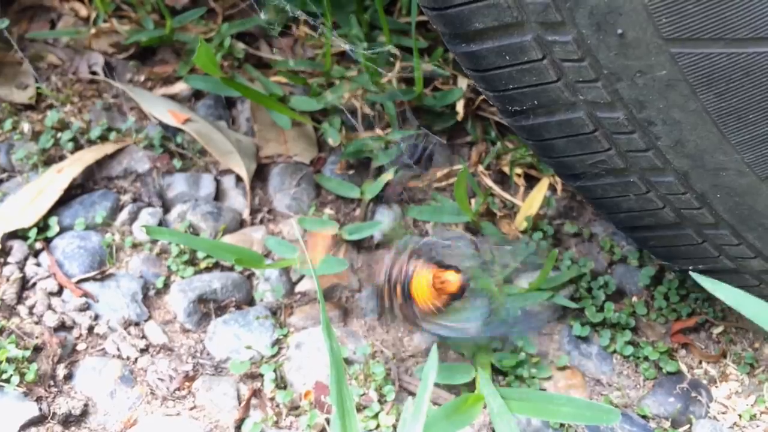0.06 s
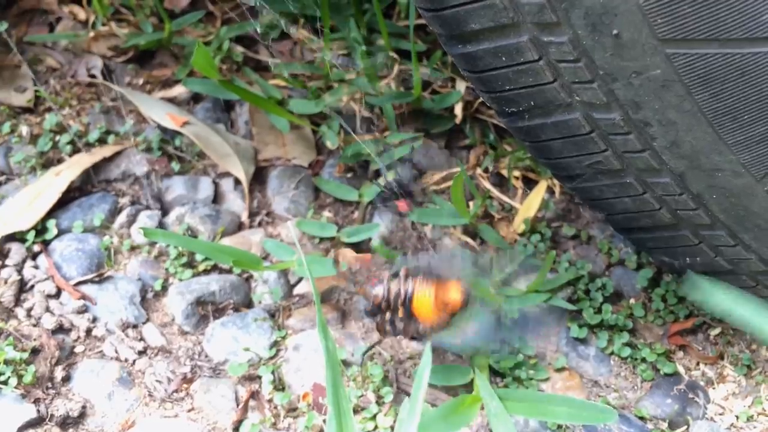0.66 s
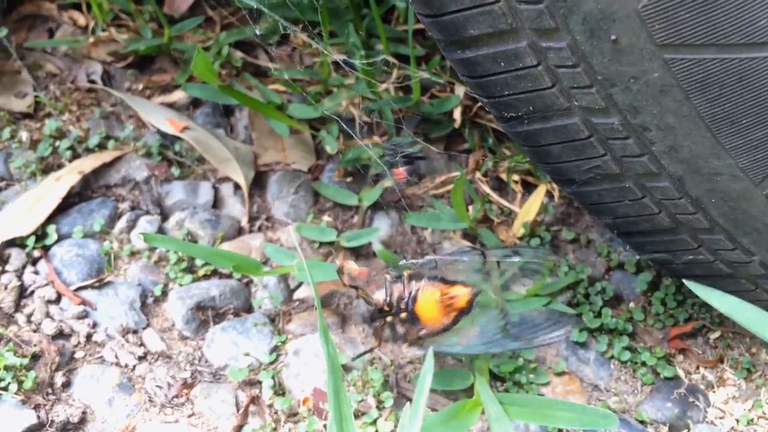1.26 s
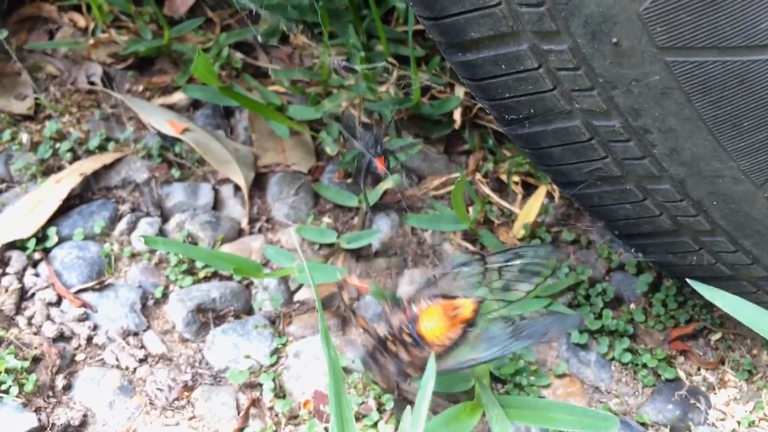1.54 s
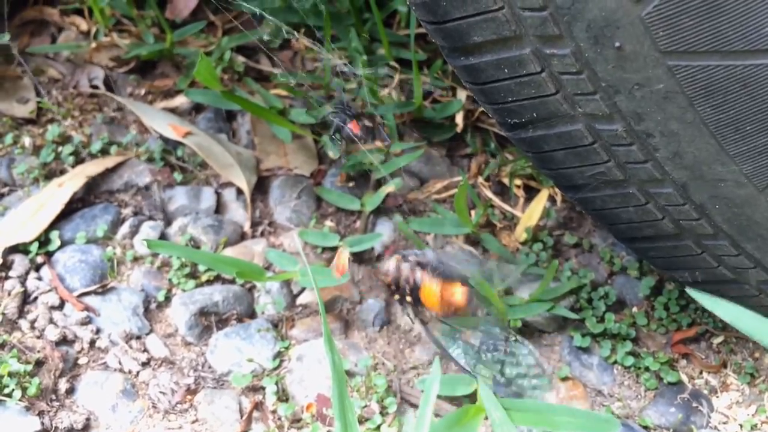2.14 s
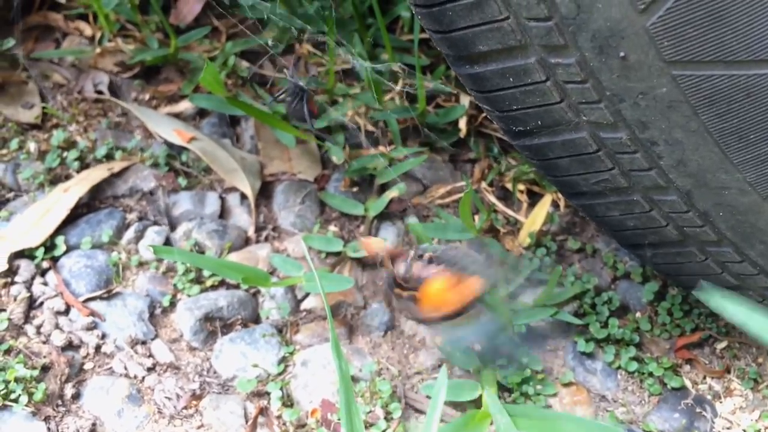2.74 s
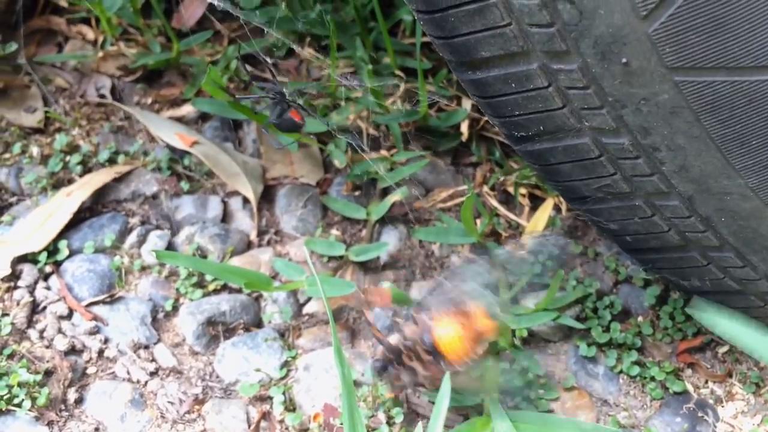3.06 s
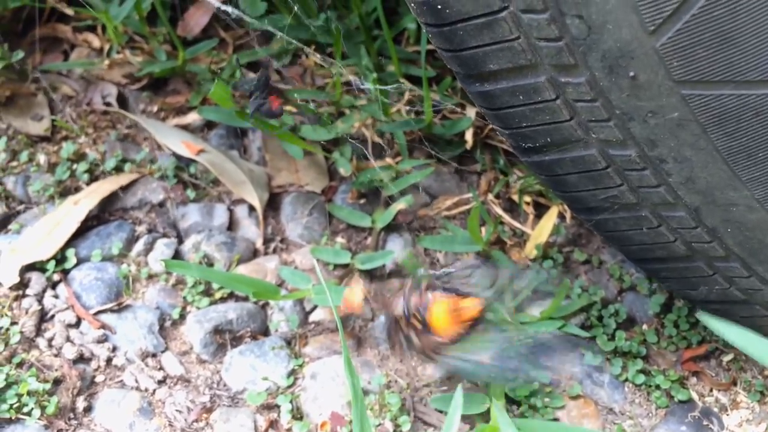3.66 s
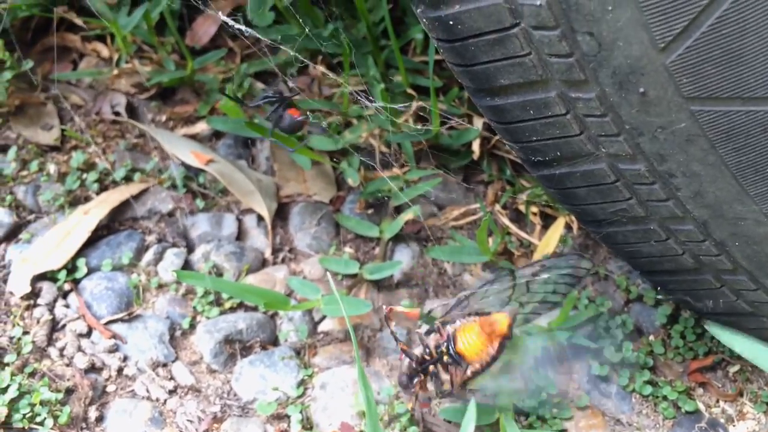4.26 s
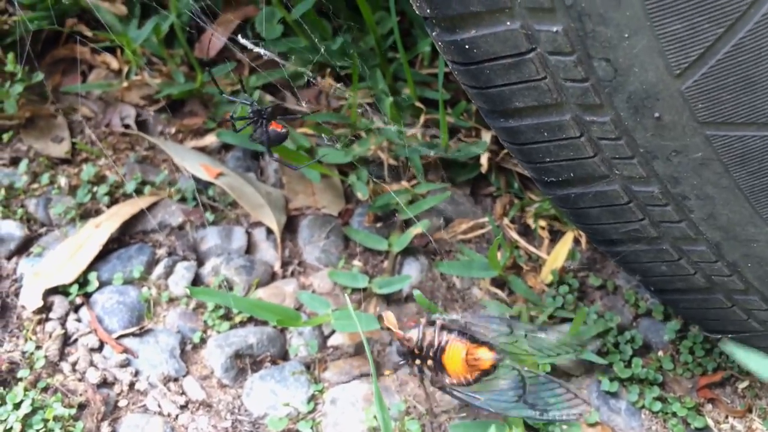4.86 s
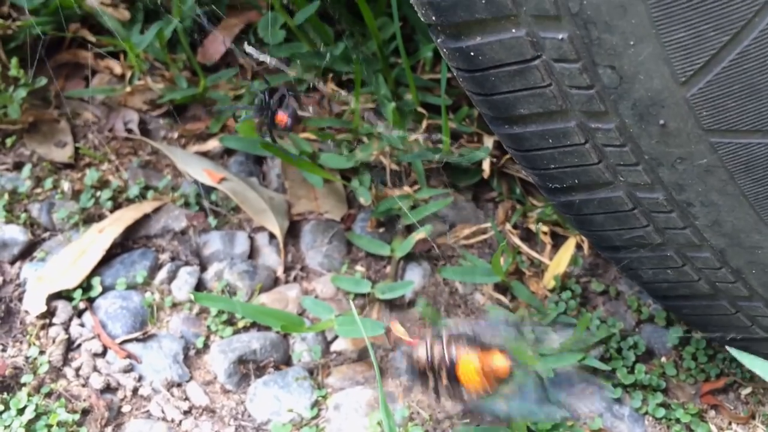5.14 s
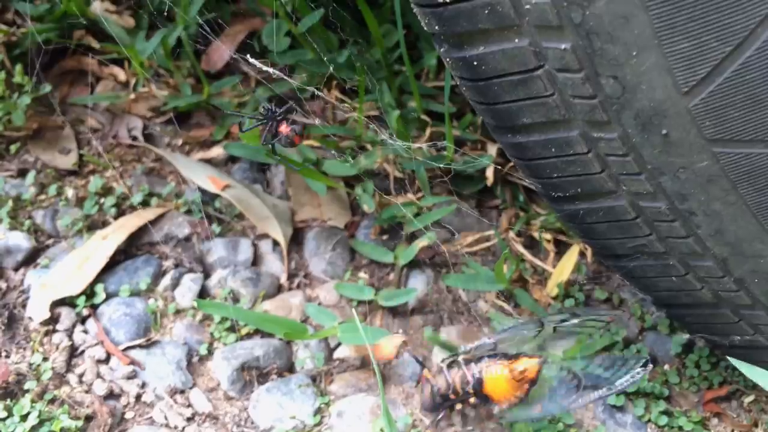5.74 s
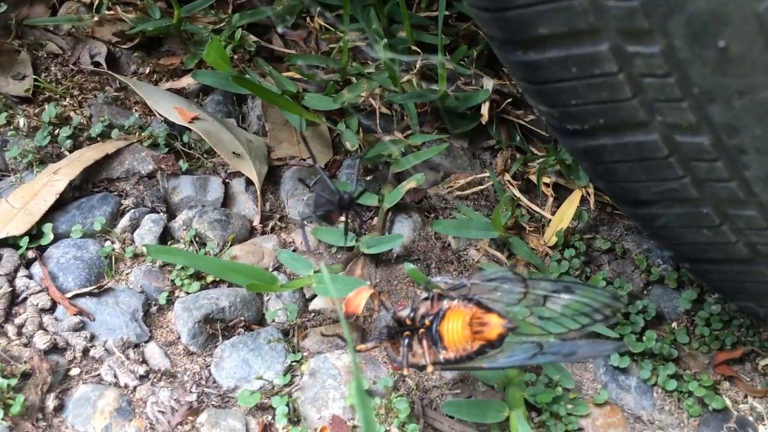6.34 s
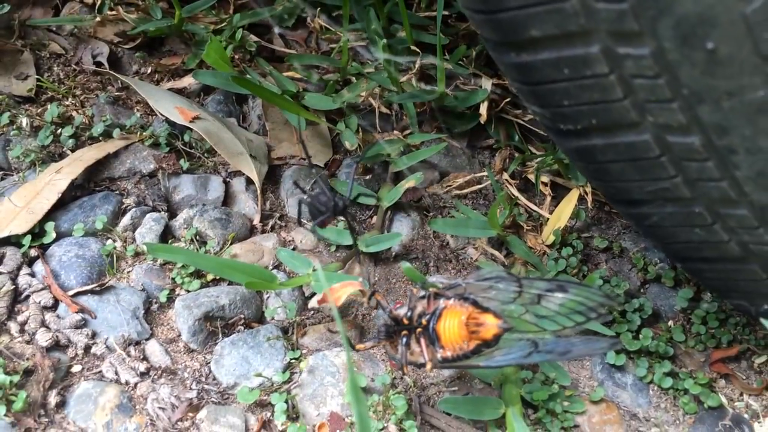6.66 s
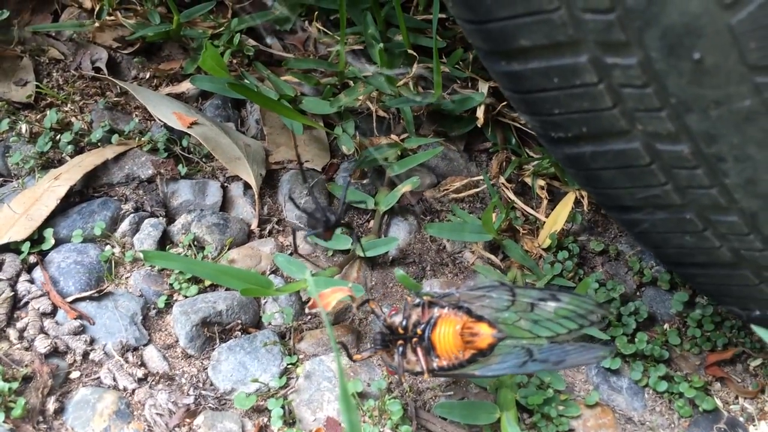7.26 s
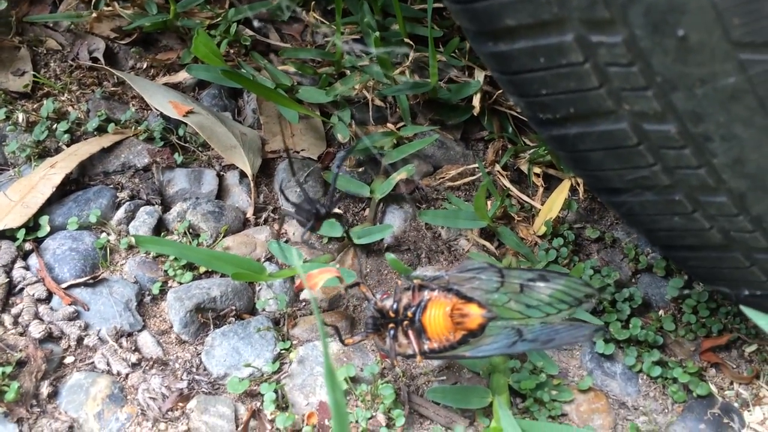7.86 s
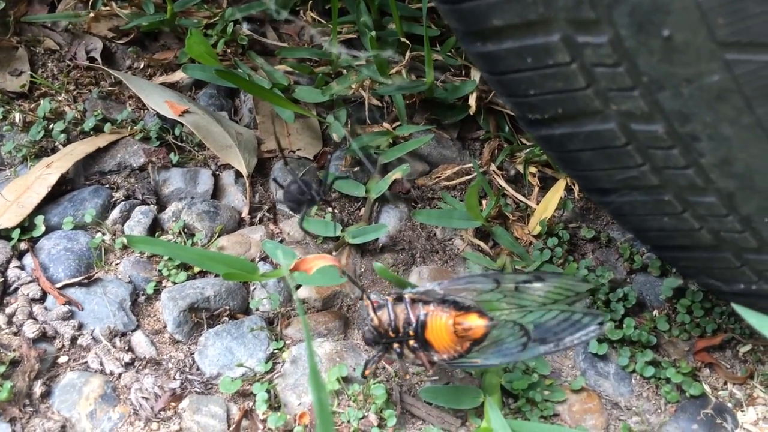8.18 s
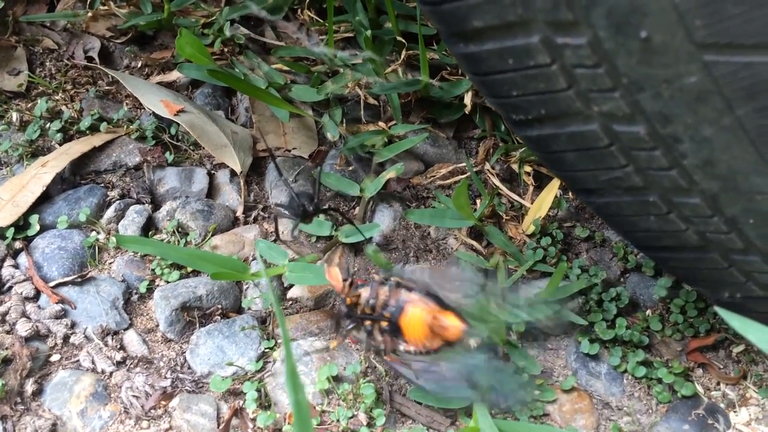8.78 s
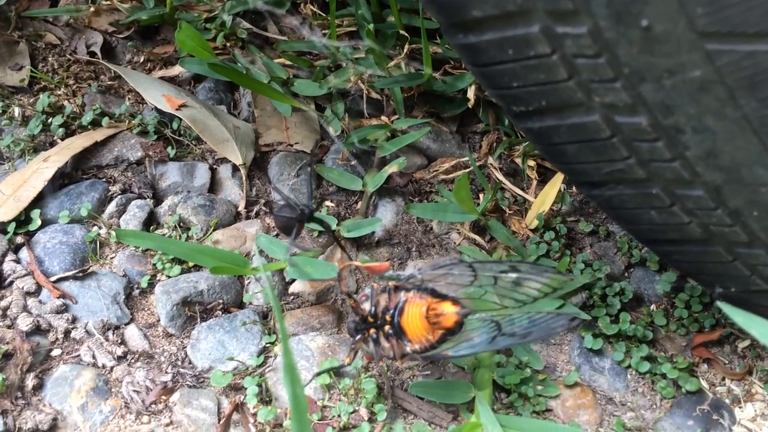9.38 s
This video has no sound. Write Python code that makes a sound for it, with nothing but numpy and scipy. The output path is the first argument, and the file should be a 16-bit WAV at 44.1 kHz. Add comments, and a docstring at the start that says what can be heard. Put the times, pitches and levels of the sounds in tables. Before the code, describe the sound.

Close, dry clicking wing flicks of a struggling insect thin out after a low microphone thud, over faint distant birds.

```python
"""On the ground outdoors, close to the microphone of a hand-held camera, a cicada thrashes in a spider's web.
From the start its stiff wings clap and rustle against grit, grass and each other, over faint hiss, rumble
and hum. From about 1 s birds whistle in the trees and the hand bumps the camera now and then; by 3 s far
insects have swelled in. Just before 6 s the camera takes one firm knock. The tiring cicada flicks once
just after the knock, pauses while hoarse birds call in the distance, then flicks twice more after 8 s."""
import sys
import numpy as np
from scipy import signal
from scipy.fft import rfft, irfft, next_fast_len
from scipy.io import wavfile
from scipy.ndimage import uniform_filter1d, map_coordinates

SR = 44100
rng = np.random.default_rng(int(sys.argv[2]) if len(sys.argv) > 2 else 0)


def unload_wav(signal):
    """Save mono or channel-first audio to the path in sys.argv[1] as 16-bit WAV at rate SR, clipped to [-1, 1]."""
    wavfile.write(
        sys.argv[1],
        SR,
        np.round(np.clip(np.atleast_2d(signal).T, -1, 1) * 32767).astype(np.int16),
    )


N = 423801

# Wing flicks close to the microphone: the wings open, clap (one leading the other) and fold shut.
# clap_s, clap_db, body_share_db, brightness_db, t60_s, lead_s, open_db, fold_after_s, fold_db, rustle_db
WING_FLICKS = [(.0436, -31.5, -5, 1, .016, 0.00069, -32, 0.021, -37, -49),
               (.236, -43, -9, 0.5, .015, 0.011, -37.5, 0.029, -37.5, -51),
               (0.4483, -37, -13, 6, 0.0099, 0.014, -39.5, 0.0065, -50, -51.5),
               (0.5997, -22, -13.5, 5, 0.007, .0073, -62, 0.026, -33, -51),
               (.8156, -20, -10.5, 5, .009, 0.0047, -51, 0.033, -26, -48.5),
               (0.8704, -36, -13.5, 5, 0.02, 0.0013, -47, 0.048, -36.5, -67),
               (1.0072, -19, -13.5, 4, 0.012, 0.0065, -54, 0.03, -32, -54.5),
               (1.2089, -24, -10, -3.5, 0.017, .0065, -46, .031, -36.5, -53.5),
               (1.4293, -25, -12, 4, .011, 0.0076, -35, 0.019, -29, -57),
               (1.4725, -20, -12.5, 3, 0.026, 0.0048, -39, 0.064, -39.5, -57.5),
               (1.7104, -17.5, -14, 3.5, 0.011, 0.0043, -43, 0.029, -37.5, -56.5),
               (2.1275, -27, -7.5, 2.5, .005, 0.0081, -47, .0235, -26, -55.5),
               (2.1798, -28, -11.5, 2.5, 0.042, 0.0016, -40, 0.055, -39.5, -60),
               (2.346, -29, -13, 4, 0.013, 0.0066, -37.5, 0.022, -47, -49),
               (2.3827, -26.5, -21, 11, .009, 0, -53, .0103, -31.5, -54),
               (2.5621, -34, -18.5, 7, 0.012, 0.013, -31, .01, -32.5, -54),
               (2.761, -21.5, -15, 10, 0.02, 0.0053, -32, 0.028, -25.5, -52),
               (2.939, -35, -13.5, 10, 0.017, .0136, -54, 0.025, -38, -53),
               (3.1552, -34.5, -15.5, 6, 0.02, 0.01, -59, .04, -34.5, -55),
               (3.4135, -28.5, -9, 2, 0.02, 0.0075, -38.5, 0.034, -25.5, -53),
               (3.4914, -37.5, -19, 17, .033, 0, -59, 0.0065, -44, -70),
               (3.6039, -24, -9.5, 5, 0.014, 0.01, -35, .012, -34, -54),
               (3.6423, -25, -8, 0.5, 0.017, 0.0018, -42, .051, -36.5, -51),
               (3.795, -25.5, -14, 2.5, 0.015, 0.0077, -52, 0.046, -32, -57.5),
               (3.9593, -22, -10, 1, 0.0096, 0.011, -60, 0.021, -51, -54.5),
               (4.1536, -19.5, -11.5, 3.5, 0.018, 0.0053, -55, 0.025, -46, -53),
               (4.3859, -25, -11, 4, 0.0076, 0.0069, -53, 0.029, -38.5, -54.5),
               (4.659, -20, -14, 4.5, 0.011, 0.0065, -47, 0.011, -38, -55),
               (5.0867, -26.5, -11.5, -2.5, 0.011, .0055, -63, 0.031, -44, -50.5),
               (5.3524, -22.5, -14, 2.5, 0.0066, 0.005, -54, 0.019, -47, -56),
               (5.5941, -20.5, -13.5, 3.5, 0.01, 0.0052, -53, 0.016, -40, -53),
               (5.9953, -30, -13.5, 8.5, 0.029, 0.0044, -44, 0.0039, -56, -68),
               (8.0822, -28, -13.5, 7, 0.021, 0.0026, -48, 0.02, -41, -65),
               (8.867, -31, -14.5, 3, 0.0072, 0.0051, -53, 0.019, -39, -57.5)]
# Lone taps of a wing, just as close: start_s, level_db
WING_TAPS = [(.5495, -47), (.7676, -46), (.975, -34.5), (1.5581, -43), (1.8624, -61), (2.7114, -42),
             (5.1237, -42.5)]
OPEN_S = 0.0265  # the wings open this long before the clap


def wing_contacts(lead_db=-7.5, graze_db=8.5, graze_spread_db=2, graze_reach_s=0.016):
    """Every touch of the wings, as rows of start_s, level_db, body_share_db, brightness_db, t60_s."""
    tap, graze = (-20, -2.2, 0.011), (-19.5, 12, 0.014)  # body_share_db, brightness_db, t60_s
    # against the clap: more_body_db, more_brightness_db; then the stroke's own t60_s
    first_wing, opening, folding = (2, -4, 0.012), (-3.5, 1, 0.017), (-4.5, 2.5, 0.026)
    rows = [(s, db, *tap) for s, db in WING_TAPS]
    for s, db, body_db, bright_db, clap_t60, lead_s, open_db, fold_s, fold_db, rustle_db in WING_FLICKS:
        rows.append((s, db, body_db, bright_db, clap_t60))
        strokes = [(s - lead_s, db + lead_db, first_wing),
                   (s - OPEN_S, open_db, opening),
                   (s + fold_s, fold_db, folding)]
        for when, level, (more_body, more_bright, t60) in strokes:
            rows.append((when, level, body_db + more_body, bright_db + more_bright, t60))
        # wing tips graze the ground by chance as they open and as they fold
        for centre in (s - OPEN_S - graze_reach_s / 2, s + fold_s):
            late, soft = rng.uniform(-1, 1, 2)
            rows.append((centre + graze_reach_s * late, rustle_db + graze_db - graze_spread_db * soft,
                         *graze))
    return rows


# Ring of the stiff wing membrane, heard from close by: frequency_hz, gain_db
WING_RING = [(150, -11), (290, -15.5), (430, -7), (880, -4.5), (1250, -5.5), (2100, -8.5), (3100, -5),
             (4200, -13.5), (5200, -10), (6250, -2), (7600, -7), (10200, -2.5), (12500, -4.5),
             (15000, -7.5)]


def wing_claps(snap=2.94, crinkle=0.58, firmness=0.21, heft=0.21, rise_s=0.00024, bounce_s=0.0012):
    """A wing strikes with one sharp snap, then its membrane crinkles for a few milliseconds."""
    size = 4096
    out, t, hz = np.zeros(N), np.arange(size) / SR, np.fft.rfftfreq(size, 1 / SR)
    deep = 1 / (1 + (hz / 600) ** 4)
    body = 1 / (1 + (hz / 4200) ** 8)
    bright = 1 - 1 / (1 + (hz / 9000) ** 6)
    middle = (1 - body) * (1 - bright)
    ring = amp(along(WING_RING, hz))
    hardest_db = max(row[1] for row in WING_FLICKS)
    for s, db, body_db, bright_db, t60 in wing_contacts():
        force_db = db - hardest_db
        noise, grain = rng.standard_normal((2, size))
        # the crinkling comes in clumps, one for each fold that gives way
        folds = np.exp(crinkle * unit(uniform_filter1d(grain, size=16)))
        blow = noise * unit(folds) * amp(-60 * t / t60)
        # glancing blows slide into contact and hardly snap
        blow *= 1 - np.exp(-t * amp(force_db / 2) / rise_s)
        blow[0] -= snap * amp(firmness * force_db)
        # the place of contact sets how strongly body and tip of the wing sound
        tip = amp(bright_db) ** 2
        shares = [(body, amp(body_db) ** 2), (middle, 1 / (1 + tip)), (bright, tip / (1 + tip))]
        gain = ring * np.sqrt(sum(band * share / np.sum(band * ring ** 2) for band, share in shares))
        # only hard blows near the wing's root bend the whole wing
        gain *= amp((heft * force_db - 0.75 * bright_db + 2) * deep)
        # the nearest stones throw the clap back within a millisecond or two
        stones = 1 + 0.22 * np.exp(-2j * np.pi * hz * bounce_s * rng.uniform(0.49, 2))
        clap = irfft(rfft(blow) * causal(gain) * stones)
        add(out, s, amp(db) * clap * np.sqrt(SR / 500 / np.sum(clap ** 2)))  # level as if 2 ms long
    return out


# Wings brushing grass and grit in front of the microphone: frequency_hz, gain_db
BRUSH_SPECTRUM = [(200, -37), (700, -7), (2000, -11), (4500, -8.5), (6300, -8), (10000, -1), (15000, -12)]


def wing_rustle(beat_hz=41, beat_db=4, open_db=-7, open_width_s=0.015,
                rise_s=0.0071, settle_s=0.018, fade_s=0.012):
    """As they open, and from the clap until they fold, the wings brush the ground in tiny ticks."""
    t = np.arange(SR // 4) / SR
    effort = np.zeros(N)
    for s, *_, fold_s, _, rustle_db in WING_FLICKS:
        start = max(s - 0.1, 0)
        since = start + t - s
        opening = amp(open_db) * np.exp(-((since + OPEN_S + open_width_s / 2) / open_width_s) ** 2 / 2)
        early, late = np.maximum(-since, 0), np.maximum(since - fold_s - settle_s, 0)
        closing = np.exp(-early / rise_s - late / fade_s)
        add(effort, start, amp(rustle_db) * np.maximum(opening, closing))
    stroke = np.sin(2 * np.pi * np.cumsum(beat_hz * (1 + 0.1407 * wobble(12))) / SR)
    ticks = rng.standard_normal(N) * amp(5 * wobble(450) + 3 * wobble(2500))
    return effort * coloured(ticks * amp(beat_db * stroke), BRUSH_SPECTRUM)


# Bumps of the hand, right at the microphone: start_s, level_db, length_s, pitch_hz
HAND_BUMPS = [(1.196, -46, 0.049, 81), (1.427, -54, .063, 102), (1.626, -56.5, .12, 58),
              (3.159, -45, 0.11, 60.7), (3.59, -48, 0.063, 59.4), (3.982, -49.5, 0.067, 60.5),
              (5.312, -45.5, 0.069, 64.4), (5.636, -52, 0.065, 80), (5.781, -42.5, 0.11, 61.3),
              (6.781, -50, 0.035, 79), (7.058, -47.5, 0.085, 90.6), (7.259, -45.5, 0.074, 74.8),
              (7.469, -49, 0.089, 85.2), (7.799, -54, 0.095, 63), (8.101, -51, .035, 65.6),
              (8.861, -50, 0.062, 80.7), (9.453, -49.5, .05, 60)]


def hand_bumps():
    """Fingers shift on the camera in dull bumps that swell quickly and die away."""
    out = np.zeros(N)
    spectrum = [(15, -27), (35, -1.5), (65, 2), (100, -2), (170, -16.5), (260, -31), (600, -66),
                (1500, -100)]  # frequency_hz, gain_db
    rub = coloured(rng.standard_normal(N), spectrum)
    for s, db, length, pitch_hz in HAND_BUMPS:
        u = np.arange(round(3 * length * SR)) / (length * SR)
        speed = pitch_hz / 65  # moves the rub's 65 Hz peak to the bump's pitch
        pitched = map_coordinates(rub, [s * SR / 2 + speed * np.arange(len(u))], order=1)
        bump = pitched * u ** 2 * np.exp(-6 * u)
        add(out, s, amp(db) * unit(bump) / np.sqrt(3))
    return out


# Modes of the camera rocking in the hand: pitch_hz, relative_db, t60_s
GRIP_MODES = [(59.2, -4.5, 0.23), (85, 6, 0.066), (148, -5, .04)]


def camera_knock(start_s=5.763, gain_db=-14.5, attack_s=0.0076):
    """One firm knock makes the camera rock in the hand with a low thud."""
    out, t = np.zeros(N), np.arange(SR // 2) / SR
    ring = sum(amp(db - 60 * t / t60) * np.sin(2 * np.pi * hz * t) for hz, db, t60 in GRIP_MODES)
    add(out, start_s, amp(gain_db) * ring * (1 - np.exp(-(t / attack_s) ** 2)))
    return out


# Birds off in the trees: start_s, length_s, first_hz, last_hz, level_db, octave_db
BIRD_WHISTLES = [(.92, .06, 2550, 2880, -62, -24), (1.008, 0.061, 2100, 2680, -51, -20),
                 (1.056, 0.0276, 3770, 3050, -55, -24), (1.1, 0.063, 3440, 3180, -59, -24),
                 (1.143, 0.1, 3250, 2810, -51, -15), (3.001, 0.028, 5020, 4510, -54, -22),
                 (3.026, 0.029, 2970, 2630, -50.5, -20), (3.056, 0.052, 2590, 3020, -52, -24),
                 (3.088, 0.09, 3630, 4120, -50, -22), (3.177, .088, 3300, 3580, -55, -5),
                 (2.995, 0.059, 1725, 1570, -64.5, 0), (4.958, 0.034, 2720, 2340, -55.5, -19),
                 (4.986, 0.038, 2550, 2720, -50, -18), (5.012, 0.027, 3860, 3580, -59, -24),
                 (5.129, .14, 3100, 2470, -57, -18), (6.457, .11, 1600, 1920, -66, -24),
                 (7.577, 0.23, 1240, 1545, -70, -24), (7.756, .127, 1507, 1990, -68, -26),
                 (7.923, 0.3, 2130, 2090, -69, -22), (9.019, .087, 2000, 2140, -65, -24)]


def bird_whistles(glide=1.5, waver=0.0083, rasp=0.023, break_db=3.5):
    """Slightly raspy, broken whistles with a weak octave slide fast, then settle on their last pitch."""
    drift = 1 + waver * wobble(120) + rasp * wobble(900)
    flicker = unit(amp(break_db * wobble(80)))
    out = np.zeros(N)
    for start, length, first, last, db, octave_db in BIRD_WHISTLES:
        u = np.linspace(0, 1, round(length * SR))
        pitch = last + (first - last) * (1 - u) ** glide
        phase = 2 * np.pi * np.cumsum(pitch * drift[round(start * SR):][:len(u)]) / SR
        tone = np.sin(phase) + amp(octave_db) * np.sin(2 * phase)
        add(out, start, amp(db) * np.sqrt(np.abs(np.sin(np.pi * u))) * tone)
    return out * flicker


# Hoarse birds, far off: peak_s, pitch_hz, level_db, roughness_share, swell_s, tilt_db_per_octave
HOARSE_CALLS = [(6.51, 2103, -60, 0.048, 0.11, -2), (7.19, 2470, -56.5, 0.089, 0.051, -7),
                (9.071, 2030, -70, 0.116, 0.076, 7)]
# Partials of their voice: pitch_multiple, relative_db
CALL_PARTIALS = [(1.5, -3.5), (2, 0.5), (3, -6), (4, -11)]
# Hiss in their voice: frequency_hz, gain_db
CALL_BREATH = [(1000, -3), (3500, -4), (6000, -5), (9000, -24), (14000, -25)]


def hoarse_calls(breath_db=-11):
    """Hoarse calls swell and fade; their pitch shakes so fast that their partials smear."""
    out, t = np.zeros(N), np.arange(SR) / SR - 0.5
    shake = wobble(1100)
    breath = amp(breath_db) * coloured(rng.standard_normal(N), CALL_BREATH)
    for peak_s, pitch, db, rough, swell_s, tilt_db in HOARSE_CALLS:
        first = round((peak_s - 0.5) * SR)
        phase = 2 * np.pi * np.cumsum(pitch * (1 + rough * shake[first:][:SR])) / SR
        tone = sum(amp(level + tilt_db * np.log2(k)) * np.sin(k * phase) for k, level in CALL_PARTIALS)
        voice = unit(unit(tone) + breath[first:][:SR])
        add(out, peak_s - 0.5, amp(db) * voice * np.exp(-(t[:len(voice)] / swell_s) ** 2))
    return out


# Insects far from the microphone: centre_hz, width_hz, level_db
INSECT_BANDS = [(2396, 280, -73), (3350, 550, -74)]
# Their slow swell: time_s, gain_db
INSECT_SWELL = [(0, -23), (3, -3), (5.5, -1.5), (6.8, 0), (9.6, -2)]


def far_insects():
    """Many far insects merge into narrow, wavering bands."""
    out, swell_db = np.zeros(N), over_time(INSECT_SWELL)
    for centre, width, db in INSECT_BANDS:
        level = amp(db + swell_db + 2.8 * wobble(14))
        band = filtered(rng.standard_normal(N), lambda hz: 1 / (1 + (2 * (hz - centre) / width) ** 4))
        out += level * unit(band)
    return out


# Rumble from far away: frequency_hz, density_db
RUMBLE_SPECTRUM = [(15, -30), (30, -5), (55, -1), (90, 1), (130, -0.5), (190, -3.5), (260, -18),
                   (400, -17.5), (700, -36.5), (1500, -73)]


def far_rumble(level_db=-60.5):
    """Deep, distant noise that wavers in level."""
    return amp(level_db + 2.5 * wobble(8)) * coloured(rng.standard_normal(N), RUMBLE_SPECTRUM)


# Hiss of distant leaves in the open air: frequency_hz, density_db
LEAF_SPECTRUM = [(250, 2.5), (400, -2), (700, -8.5), (1200, -11.5), (1950, -9.5), (2450, -5.5),
                 (2850, -2.5), (3400, -6.5), (4800, -6.5), (6500, -13.5), (8200, -13.5), (10000, -11.5),
                 (11200, -16.5), (12500, -22), (15000, -24.5)]
# Its slow drift: time_s, relative_db
LEAF_DRIFT = [(0, -65), (3.2, -65.5), (6, -67), (9.6, -66.5)]


def leaf_hiss(gain_db=2):
    """Distant leaves blend into a thin, nearly steady hiss."""
    level = amp(over_time(LEAF_DRIFT) + gain_db + wobble(11))
    return level * coloured(rng.standard_normal(N), LEAF_SPECTRUM)


# A low hum in the distance: time_s, level_db
HUM_LEVEL = [(0, -64.5), (1.3, -67), (1.6, -62.5), (3.6, -60.5), (4.2, -81), (9.6, -87)]


def far_hum(pitch_hz=57):
    """One low tone wavers in pitch and level, and drops away at about 4 s."""
    phase = 2 * np.pi * np.cumsum(pitch_hz + 0.8 * wobble(4)) / SR
    return amp(over_time(HUM_LEVEL) + 3.2 * wobble(5.15)) * unit(np.sin(phase))


def amp(db):
    """Decibels to gain."""
    return 10 ** (np.asarray(db) / 20)


def unit(x):
    """Scaled to rms 1."""
    return x / np.sqrt(np.mean(x ** 2) + 1e-20)


def along(points, hz):
    """Rows of frequency_hz, value read on a log axis."""
    frequencies, values = np.transpose(points)
    return np.interp(np.log(hz + 1), np.log(frequencies + 1), values)


def over_time(points):
    """Rows of time_s, value read at every sample."""
    return np.interp(np.arange(N) / SR, *np.transpose(points))


def wobble(rate):
    """A smooth random curve, rate knots a second."""
    knots = rng.standard_normal(int(N * rate / SR) + 4)
    fine = np.arange(0, len(knots) - 1, 1 / 8)
    return np.interp(np.arange(N) * (rate / SR), fine, map_coordinates(knots, [fine]))


def filtered(x, response):
    """x times a response of frequency."""
    size = next_fast_len(N + SR // 2)
    return irfft(rfft(x, size) * response(np.fft.rfftfreq(size, 1 / SR)), size)[:N]


def coloured(x, spectrum):
    """x given a spectrum, at rms 1."""
    return unit(filtered(x, lambda hz: amp(along(spectrum, hz))))


def causal(gain):
    """The response with this gain that rings only after the blow."""
    cepstrum = irfft(np.log(np.maximum(gain, 1e-6)))
    half = len(cepstrum) // 2
    cepstrum[1:half] *= 2
    cepstrum[half + 1:] = 0
    return np.exp(rfft(cepstrum))


def add(track, s, sound):
    """Mix a sound into the track at time s."""
    part = track[max(round(s * SR), 0):][:len(sound)]
    part += sound[:len(part)]


def echo(x, decay):
    """A diffuse tail in which each frequency dies at its own speed."""
    hz, t, noise = signal.stft(rng.standard_normal(SR), SR, nperseg=256)
    fade = amp(-60 * t / along(decay, hz)[:, None])
    tail = signal.istft(noise * fade, SR, nperseg=256)[1]
    return signal.fftconvolve(x, tail / np.linalg.norm(tail))[:N]


# Short echo off the ground around the microphone: frequency_hz, t60_s
GROUND_DECAY = [(300, 0.093), (3000, 0.066), (12000, 0.06)]
# Longer echo among the trees: frequency_hz, t60_s
TREE_DECAY = [(300, .4), (3000, 0.5), (10000, 0.74)]


def scene():
    """At the microphone the near wings are almost dry; the birds arrive through the trees."""
    wings = wing_claps() + wing_rustle()
    near = wings + amp(-19.5) * echo(wings, GROUND_DECAY)
    song = bird_whistles() + hoarse_calls()
    far = amp(0.5) * song + amp(-4) * echo(song, TREE_DECAY) + far_insects()
    handling = hand_bumps() + camera_knock()
    return near + handling + far + far_rumble() + leaf_hiss() + far_hum()


def record(dry, low_cut_hz=50, top_hz=15350):
    """The microphone drops the deepest bass; the camera keeps nothing above its band limit."""
    bass_cut = lambda hz: (1j * hz) ** 2 / (low_cut_hz ** 2 - hz ** 2 + 1j * hz * low_cut_hz)
    return filtered(dry, lambda hz: bass_cut(hz) / np.sqrt(1 + (hz / top_hz) ** 160))


dry = scene()
out = record(dry)
unload_wav(out)
```